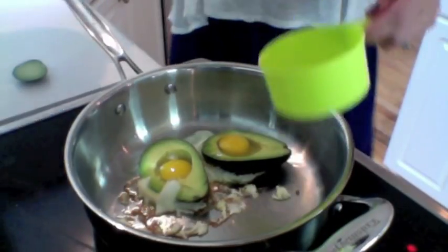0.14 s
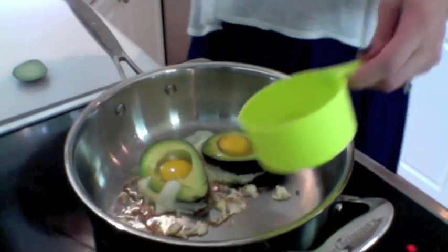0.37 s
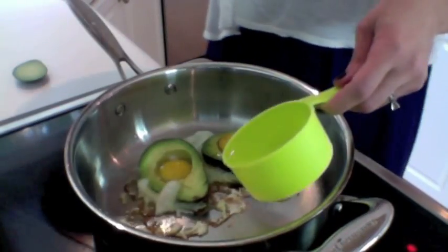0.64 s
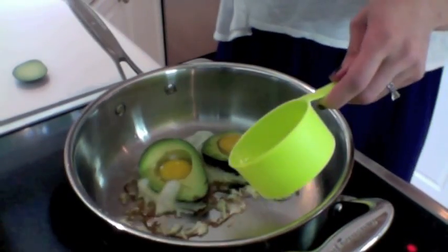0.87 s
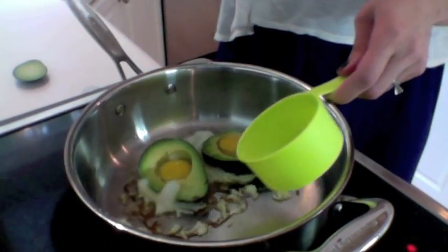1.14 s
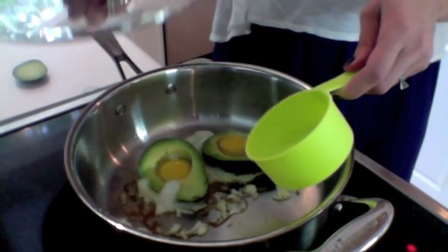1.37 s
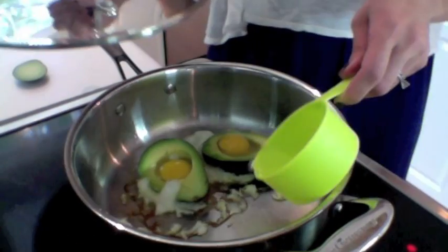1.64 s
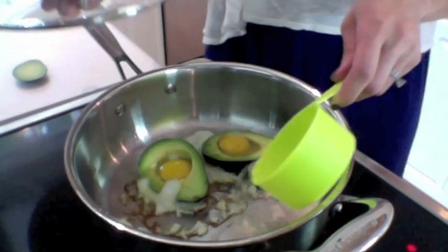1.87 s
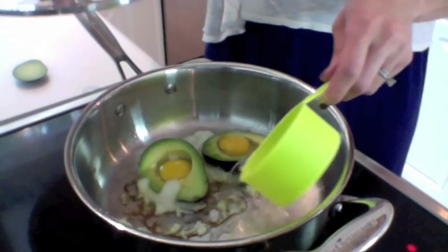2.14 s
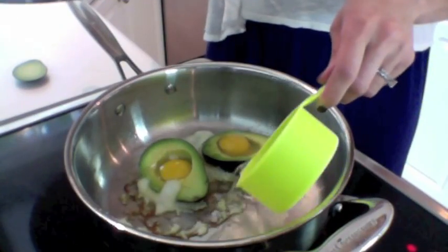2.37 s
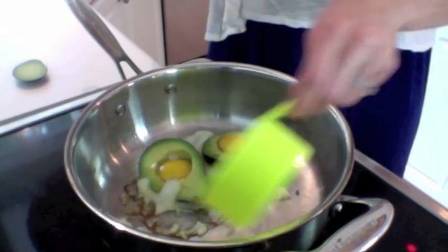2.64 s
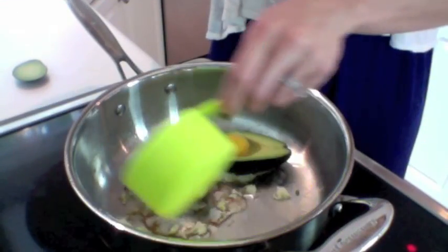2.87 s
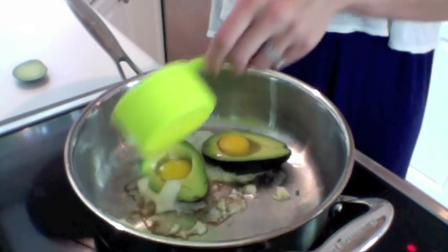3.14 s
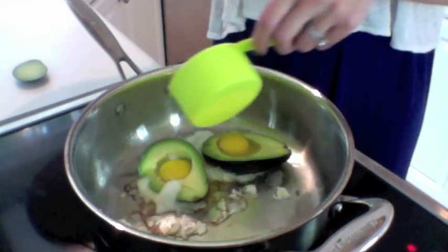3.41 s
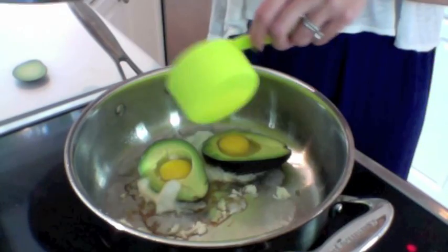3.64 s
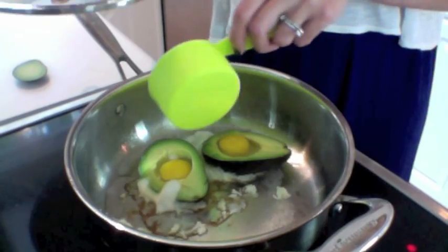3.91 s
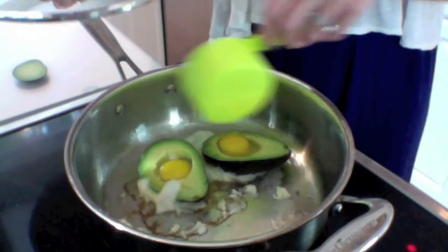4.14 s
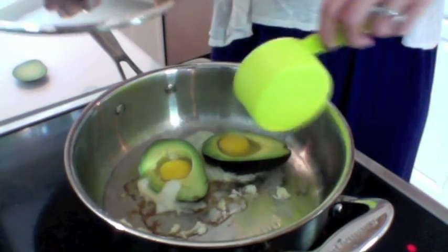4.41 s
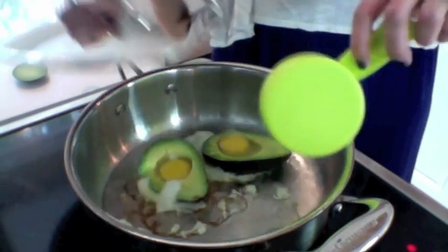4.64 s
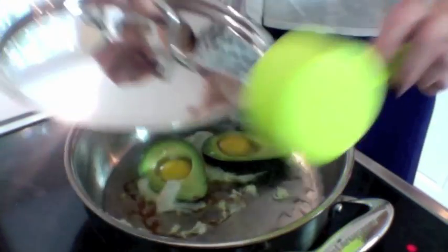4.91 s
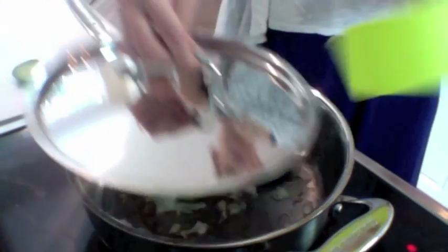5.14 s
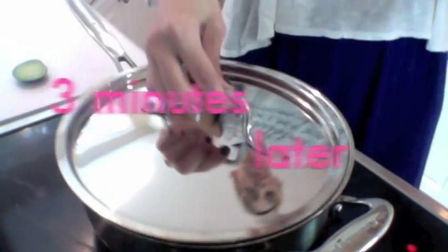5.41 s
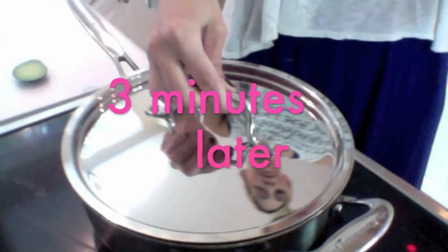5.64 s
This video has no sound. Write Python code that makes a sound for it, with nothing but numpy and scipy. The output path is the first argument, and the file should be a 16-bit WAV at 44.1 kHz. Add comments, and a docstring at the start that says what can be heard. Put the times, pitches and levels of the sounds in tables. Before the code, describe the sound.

Water poured into a hot oiled steel pan flares into loud sizzling and bubbling, calms, then a metal lid clanks shut and a plastic cup is set down.

```python
"""A small microphone near the stove in a kitchen: over a hush and hum, food spits in an oiled steel pan.
Cracks with sprays of noise are droplets; short dull puffs with dying tones are bubbles popping, and knocks.
A cup touches the pan and water is poured in: noise flares up, and filtered noise roars, bubbles, fizzes, calms.
A faint whistle swells; a steel lid touches the rim, wavers (ringing modes, a throbbing tone) and drops shut.
Last, the plastic cup is set down: softer knocks that ring its own modes."""
import sys
import numpy as np
from scipy import signal
from scipy.fft import rfft, irfft
from scipy.io import wavfile
from scipy.ndimage import uniform_filter1d

SR = 44100
rng = np.random.default_rng(int(sys.argv[2]) if len(sys.argv) > 2 else 0)


def master(y):
    """Save y as 16-bit WAV."""
    cut = np.clip(np.atleast_2d(y).T, -1, 1)
    pcm = np.round(cut * 32767)  # scale
    wavfile.write(sys.argv[1], SR, pcm.astype(np.int16))


def undo_db(level):
    """Turn decibels back into plain size, where 20 dB means ten times bigger."""
    steps = np.asarray(level, float) / 20
    return 10 ** steps


N = 254898

# how unevenly the fat fizzes: t/s, factor
UNEVENNESS = [(1.2, 0.48), (2.0, 0.91), (2.15, 1.32), (2.95, 0.96), (3.1, 0.61), (5.8, 0.6)]
# the lid chattering into place, with one rebound: t/s, rattle level/dB, scrape level/dB, length/s
LID_KNOCKS = [(5.269, -45.5, -56, 0.007), (5.272, -41, -52, 0.055), (5.357, -56, -80, 0.013)]


def evened(x):
    """Scales to rms 1."""
    return x / np.sqrt(np.mean(x ** 2) + 1e-20)


def coloured(x, points):
    """Shapes x by a spectrum of (f/Hz, level/dB) points; rms 1."""
    f, db = np.transpose(points)
    hz = np.fft.rfftfreq(len(x), 1 / SR)
    gain = undo_db(np.interp(np.log(hz + 1), np.log(f + 1), db))
    return evened(irfft(rfft(x) * gain, len(x)))


def add(mix, s, sound):
    """Mixes a sound in at s seconds."""
    part = mix[round(s * SR):][:len(sound)]
    part += sound[:len(part)]


def resonate(x, hz, width):
    """One pole at hz, width in Hz: a resonance of gain 1."""
    r = np.exp(-np.pi * width / SR)
    return 2 * signal.lfilter([1 - r], [1, -r * np.exp(2j * np.pi * hz / SR)], x).real


def mode_width(t60):
    """Width in Hz of a mode that dies by 60 dB in t60 seconds."""
    return np.log(1000) / np.pi / t60


def ring(x, modes):
    """Clicks in x set off dying modes, each starting at its own level."""
    return sum(undo_db(db) * resonate(x, hz, mode_width(t60)) * t60 * SR / 2 / np.log(1000)
               for hz, db, t60 in modes)


def clang(x, modes):
    """Knocks in x ring each mode, which takes its own share of their energy."""
    rung = [resonate(x, hz, mode_width(t60)) for hz, db, t60 in modes]
    return sum(undo_db(mode[1]) * evened(r) for mode, r in zip(modes, rung)) * np.std(x)


def drift(seconds):
    """Slow chance of spread 1."""
    size = round(seconds * SR)
    return evened(uniform_filter1d(uniform_filter1d(rng.standard_normal(N), size), size))


def crackle(per_s, spread_db, tail_s):
    """Random bursts of uneven size, each a puff of noise that swells fast and dies more slowly."""
    size = undo_db(spread_db * np.minimum(rng.exponential(1, N), 4))
    size *= rng.random(N) < per_s / SR
    power = signal.lfilter([1], [1, -np.exp(-1 / (tail_s * SR))], size ** 2)
    power = signal.lfilter([1], [1, -np.exp(-3 / (tail_s * SR))], power)
    return evened(np.sqrt(power) * rng.standard_normal(N))


def patchy(x, patch_db, whistle, tilt_db=0):
    """Random patches some hundred Hz wide, brief narrow whistles of escaping steam, and a tilt in dB per octave."""
    hz, t, z = signal.stft(x, SR, nperseg=256, noverlap=192)
    field = uniform_filter1d(rng.standard_normal(z.shape), size=3, axis=0)
    field = evened(uniform_filter1d(field, size=20, axis=1))
    starts = rng.random(z.shape) * (rng.random(z.shape) < 0.012)
    streaks = signal.lfilter([1], [1, -0.945], uniform_filter1d(starts, size=3, axis=1), axis=1)
    sputter = np.interp(t, *np.transpose(UNEVENNESS))
    slope = np.interp(t, np.arange(N) / SR, tilt_db * np.ones(N))
    z = z * (1 + whistle * sputter * streaks)
    z = z * undo_db(patch_db * sputter * field + slope * np.log2((hz[:, None] + 100) / 9000))
    return signal.istft(z, SR, nperseg=256, noverlap=192)[1][:N]


def bowl(x, lift_db):
    """The bowl of steel and air adds its resonances to what sounds inside it."""
    # f/Hz, width/Hz, level/dB
    pan_modes = [(580, 63, -8), (713, 11.3, -3), (1160, 7.3, 4), (1640, 20, 0), (2070, 36, 0.5),
                 (2190, 144, 3.5), (2790, 84, 5), (3290, 640, 7), (3760, 66, 7)]
    return x + undo_db(lift_db) * sum(undo_db(db) * resonate(x, hz, width) for hz, width, db in pan_modes)


def room(x):
    """Sparse reflections of random sign die away exponentially behind the direct sound."""
    level_db, t60_s = -8.5, 0.17
    taps = np.zeros(SR // 2)
    at = np.arange(200, len(taps) - 20, 20)
    taps[at + rng.integers(0, 20, len(at))] = rng.choice([-1., 1.], len(at))
    taps *= undo_db(-60 * np.arange(len(taps)) / SR / t60_s)
    return x + undo_db(level_db) * signal.oaconvolve(x, taps / np.linalg.norm(taps))[:N]


def kitchen():
    """A hush, steady below 500 Hz and fluttering at random above, with the faint hum of appliances."""
    # spectrum of the hush: f/Hz, level/dB per Hz
    hush_spectrum = [(12, -60), (20, -53), (91, -2.5), (147, -7.5), (212, 1.5), (521, -5.5), (729, 0),
                     (1430, -6), (2120, -6.5), (2510, -11.5), (3330, -10.5), (4790, -13.5), (7100, -12),
                     (13900, -27.5), (16500, -58)]
    # hum of appliances: f/Hz, width/Hz, level/dB rms
    hums = [(199, 3, -86), (241.3, 4.5, -85.5), (395, 4.7, -84)]
    hush_db = -72
    noise = rng.standard_normal(N) + 0.5 * crackle(80, 0.61, 0.0021)
    hush = bowl(coloured(noise, hush_spectrum), -8.5)
    steady = signal.sosfiltfilt(signal.butter(2, 500, fs=SR, output="sos"), hush)
    fluttering = undo_db(2.4 * drift(0.023)) * (hush - steady)
    hum = sum(undo_db(db) * evened(resonate(rng.standard_normal(N), hz, width)) for hz, width, db in hums)
    return undo_db(hush_db) * (steady + fluttering) + hum


def set_down(drops, modes, pings, hardness_hz, clatter_db):
    """An object chatters into place: quick soft knocks ring its modes, with clatter and a bright scrape."""
    settle_db, settle_db_per_s, scrape_edge_db = -3, 1000, -14
    t = np.arange(0, .5, 1 / SR)
    shake, rub = np.zeros(len(t)), np.zeros(len(t))
    for s, rattle_db, scrape_db, length in drops:
        u = t - (s - drops[0][0])
        start = np.clip(u / 0.00076, 0, 1)
        after = undo_db(-settle_db_per_s * np.maximum(u - length, 0))
        part = np.clip(u / length, 0, 1)
        shake += start * after * undo_db(rattle_db + settle_db * (2 * part - 0.9) ** 2)
        rub += start * after * undo_db(scrape_db + scrape_edge_db * (2 * part - 1.3) ** 2)
    knocks = (rng.random(len(t)) < 3000 / SR) * rng.standard_normal(len(t))  # 3000 per second
    soft = signal.butter(3, hardness_hz, fs=SR, output="sos")
    knocks = shake * evened(signal.sosfilt(soft, evened(knocks)))
    scrape = resonate(resonate(rng.standard_normal(len(t)), 7600, 5400), 7600, 5400)
    scrape = rub * evened(scrape)
    sound = clang(knocks, modes) + undo_db(clatter_db) * knocks + 0.29 * scrape + clang(scrape, pings)
    return drops[0][0], sound


def cup():
    """The plastic cup is set down: soft knocks ring its short modes; returns the time and the sound."""
    # t/s, rattle level/dB, scrape level/dB, length/s
    cup_knocks = [(5.516, -46.5, -62.5, 0.024)]
    # f/Hz, share of energy/dB, t60/s
    cup_modes = [(81, -13, 0.043), (127, -10, 0.061), (230, -10.5, 0.11), (476, -20, 0.033),
                 (620, -3.5, 0.028), (755, 2, 0.036), (950, -1.5, 0.057), (1060, -2, 0.046),
                 (1280, -18, 0.049), (1400, -10, 0.05), (1650, -8, 0.26), (1920, -9, 0.027),
                 (2180, -23, 0.077), (2680, -28, .07), (3470, -24, .05)]
    return set_down(cup_knocks, cup_modes, [], 1600, -0.6)


def lid():
    """The lid drops shut: knocks ring the damped steel, the scrape wakes thin tones; returns time and sound."""
    # the steel, seated and damped: f/Hz, share of energy/dB, t60/s
    lid_modes = [(85, -15.5, 0.044), (263, -2.5, 0.046), (366, -11.5, 0.028), (650, -3, 0.039),
                 (747, -5.5, 0.036), (905, -0.5, 0.08), (1037, 5.5, 0.1), (1140, -25, 0.15),
                 (1295, -14, 0.34), (1390, -28, .08), (1650, -12, 0.21), (1750, -8.5, 0.042),
                 (1870, -20, .08), (2170, -3.5, .085), (2300, -16, 0.28), (2640, -25, 0.11),
                 (2800, -16, 0.13), (2944, -9, 0.048), (3260, -20, 0.044), (3880, -14.5, 0.033),
                 (3960, -26, 0.063), (4300, -39, .07), (4700, -36, 0.086)]
    # thin tones that the scrape wakes: f/Hz, share of energy/dB, t60/s
    thin_tones = [(13720, -13, 0.15), (7600, -8, 0.014), (6900, -12, 0.022), (9700, -18, 0.046),
                  (11100, -32, .05)]
    return set_down(LID_KNOCKS, lid_modes, thin_tones, 2500, -7.0)


def rim():
    """Light touches, first of the cup on the pan, later of the lid, ring these modes over a throbbing low tone."""
    # upper modes of the steel ringing freely: f/Hz, level/dB, t60/s
    rim_modes = [(746, 6, 0.024), (1030, -1, 0.31), (1140, -13, .25), (1340, -20, 0.27), (1520, -17, .8),
                 (1590, -11, .6), (1980, -12.5, 0.23), (2950, -7, 0.27)]
    # touches: t/s, level/dB
    touches = [(1.291, -63), (5.049, -40.5), (5.06, -52), (5.072, -37), (5.094, -38), (5.104, -51),
               (5.115, -58), (5.129, -64), (5.144, -53)]
    # lowest tone, wavering and sinking as the lid closes the gap: t/s, f/Hz
    lowest_tone = [(5.046, 366), (5.065, 353), (5.12, 331), (5.16, 340), (5.19, 337), (5.226, 297),
                   (5.268, 276)]
    # swells of the lowest tone: t of the peak/s, level/dB, swell/s, fade/dB per s
    throbs = [(1.3, -63.5, .01, 40), (5.052, -37, .005, 1300), (5.07, -48.5, .02, 70),
              (5.094, -45, .015, 900), (5.12, -44, .012, 800), (5.226, -48, .014, 1200),
              (5.251, -50, .011, 1200)]
    rest_hz, hardness_hz = 330, 895  # the lowest tone ahead of its first row; how hard a touch is
    taps, t = np.zeros(N), np.arange(400) / SR
    pulse = t * np.exp(-2 * np.pi * hardness_hz * t)
    for s, db in touches:
        add(taps, s, undo_db(db) * pulse / pulse.sum())
    t = np.arange(N) / SR
    hz = np.interp(t, *np.transpose(lowest_tone), left=rest_hz)
    tone = np.sqrt(2) * np.sin(2 * np.pi * np.cumsum(hz) / SR)
    throb = np.zeros(N)
    for s, db, swell, fade in throbs:
        rise = np.clip(1 + (t - s) / swell, 0, 1) ** 2
        throb += rise * undo_db(db - fade * np.maximum(t - s, 0))
    shut = np.clip((LID_KNOCKS[0][0] - t) / 0.016, 0, 1)  # the seated lid stops the ringing
    return shut * (ring(taps, rim_modes) + throb * tone)


def whistles():
    """A faint fuzzy whistle as the lid comes over, likely steam: narrow noise that swells and fades."""
    # t/s, length/s, f/Hz, level/dB
    calls = [(4.86, 0.18, 1590, -63), (5.049, .22, 1560, -67)]
    out = np.zeros(N)
    for s, length, hz, db in calls:
        size = round(length * SR)
        noise = evened(resonate(rng.standard_normal(size), hz, 0.013 * hz))
        add(out, s, undo_db(db) * np.hanning(size) ** 0.5 * noise)
    return out


def pops_and_knocks():
    """Bubbles popping, and knocks such as the cup touching the pan: a short dull puff thuds under a dying tone."""
    # t/s, tone level/dB, tone f/Hz, t60/s, thud level over the tone/dB
    thumps = [(0.069, -62, 673, .038, -1), (0.159, -57, 1150, 0.028, -1), (0.234, -54.5, 2060, 0.027, 1.5),
              (0.442, -58.5, 730, .045, 2.5), (0.484, -54, 1960, 0.043, 1), (0.548, -47, 710, 0.027, -11),
              (0.694, -37, 2226, 0.041, -7.5), (0.693, -39, 1124, 0.022, -3), (1.153, -50, 756, 0.022, -4),
              (1.267, -54, 2070, 0.071, 4), (1.292, -42, 625, 0.08, -6), (1.292, -42.5, 1593, 0.038, -6),
              (1.332, -43, 3420, .043, -8), (1.515, -42.5, 1153, 0.13, -12), (1.892, -32.5, 715, 0.042, -6),
              (2.093, -34, 693, 0.083, 3), (2.359, -43.5, 710, 0.056, -4), (2.534, -28.5, 754, 0.025, -4),
              (2.535, -26.5, 1024, 0.023, -16), (2.566, -34.5, 1600, 0.036, 0),
              (2.694, -25.5, 2640, 0.017, -4.5), (2.7, -28, 3360, 0.023, -2.5),
              (2.862, -31, 2030, 0.02, -2.5), (3.122, -35.5, 2230, 0.01, 2.5), (3.254, -37, 1615, 0.034, 1),
              (3.318, -38, 1630, 0.039, 1), (3.35, -37, 1710, 0.025, -3), (3.429, -43.5, 2190, 0.17, -10),
              (3.614, -42.5, 2200, 0.05, -13), (3.674, -44, 2180, 0.058, -6),
              (3.785, -37.5, 2070, 0.044, -6), (4.004, -43, 2070, 0.088, -10),
              (4.31, -45.5, 1160, 0.066, -9), (4.332, -43.5, 674, 0.033, 1), (4.493, -39.5, 1140, 0.019, 0),
              (5.634, -58, 890, 0.039, 2), (5.717, -53, 1480, 0.046, -6)]
    out, t = np.zeros(N), np.arange(SR // 5) / SR
    dull = signal.butter(2, [300, 3500], "band", fs=SR, output="sos")
    for s, db, hz, t60, thud_db in thumps:
        puff = signal.sosfilt(dull, rng.standard_normal(len(t)) * np.exp(-t / 0.0038))
        tone = np.sin(2 * np.pi * hz * t) * undo_db(-60 * t / t60) * np.minimum(t / 0.0019, 1)
        thud = bowl(puff, 2.7)
        add(out, s, undo_db(db) * (tone + undo_db(thud_db) * thud / abs(thud).max()))
    return out


def spits():
    """Droplets burst in the fat: a grainy spray swells and dies, with a weak and then a full crack at its start."""
    # t/s, spray level/dB, centre f/Hz, crack level over the spray/dB
    bursts = [(0.1595, -73, 5820, 3), (0.3745, -60, 9100, 0), (0.378, -51.5, 12200, 0),
              (0.381, -57, 10500, 3), (0.395, -59, 11700, 1), (0.437, -63, 8500, -3),
              (0.658, -50, 7200, -4), (0.672, -47.5, 6860, -2), (0.696, -45, 6700, 13),
              (0.843, -62, 6000, 2), (0.848, -60, 9100, 2), (0.8577, -56, 13100, 16.5),
              (0.8745, -62, 8000, 2), (0.8987, -67, 5660, 5), (1.0046, -68, 6100, 17),
              (1.1178, -58.5, 5600, -5), (1.269, -68, 6980, 1), (2.113, -52, 6090, 1),
              (2.17, -51.5, 6900, 1), (2.28, -37, 6550, -9), (2.3792, -34, 12500, 18.5),
              (2.4942, -52, 6260, 5), (2.528, -39.5, 7460, 18), (2.535, -42, 13000, 9),
              (2.603, -44, 6700, 2), (2.6963, -44, 8100, -5), (2.882, -61, 5000, 1), (2.933, -45, 7200, 10),
              (3.857, -54, 5700, 3), (4.297, -59, 6070, -1), (4.618, -55.5, 6300, 14),
              (4.779, -56, 7600, -1), (4.8192, -49.5, 6700, -4)]
    sprays, cracks, t = np.zeros(N), np.zeros(N), np.arange(SR // 3) / SR
    high = signal.butter(2, 3500, "high", fs=SR, output="sos")
    for s, db, hz, crack_db in bursts:
        noise = signal.sosfilt(high, rng.standard_normal(len(t)))
        spray = 0.15 * noise + resonate(noise, hz, 0.076 * hz) + 0.5 * resonate(noise, 7150, 1100)
        shape = 0.78 * np.exp(-t / 0.0044) + 0.21 * undo_db(-60 * t / 0.096)  # fast, then slow decay
        add(sprays, s, undo_db(db) * np.minimum(t / 0.0014, 1) * shape * evened(spray))
        crack = np.exp(-t / 0.00022) * noise
        crack *= undo_db(db + crack_db) / abs(crack).max()
        add(cracks, s + 0.0017, crack)
        add(cracks, s + 0.0013, 0.27 * crack)
    return patchy(sprays, 0.93, 3.5) + cracks


def boil():
    """Steam roars in the pan, bubbles burst low in it and the fat fizzes above."""
    # the water boiling off: t/s, roar level/dB, bubbling level/dB, fizz level/dB
    boil_levels = [(1.24, -91, -83, -79), (1.28, -71, -75, -65.5), (1.309, -58.5, -55, -53),
                   (1.44, -50, -63, -48), (1.51, -45.5, -52, -45.5), (1.68, -45.5, -48, -49),
                   (1.86, -45.5, -48.5, -53), (2.05, -47, -51, -57.5), (2.13, -47, -49, -61),
                   (2.35, -47.5, -49, -57), (2.52, -50, -51, -62), (2.6, -44, -49, -57),
                   (2.7, -45.5, -48, -54.5), (2.81, -45.5, -47.5, -49), (2.94, -46, -54, -57.5),
                   (3.0, -49, -52.5, -61), (3.34, -54, -50, -58.5), (3.8, -55, -56, -62.5),
                   (4.26, -61, -59.5, -66.5), (4.35, -57.5, -58, -63.5), (4.91, -59, -58, -65),
                   (5.03, -64.5, -64.5, -67), (5.228, -64.5, -61.5, -72), (5.338, -73, -59, -94),
                   (5.406, -66, -61, -99), (5.78, -73, -82, -101)]
    # spectrum of roar and bubbling ahead of the pan: f/Hz, level/dB per Hz
    roar_spectrum = [(59, -61), (100, -58), (252, -9), (460, -9.5), (709, -0.5), (958, -4.5), (1130, -0.5),
                     (1400, -4.5), (1620, 4.5), (2500, -1), (9000, -20.5), (11700, -82), (19800, -120)]
    # spectrum of the fizz ahead of its tilt: f/Hz, level/dB per Hz
    fizz_spectrum = [(2350, -10), (4000, 1.5), (4980, -1.5), (7820, -3.5), (11900, -15.5), (14300, -16),
                     (16000, -21), (16500, -81)]
    # water meeting hot fat flares up at once and fades: t/s, level/dB, fade/dB per s, brightness/dB per octave
    flare_rows = [(1.3, -50, 38, 5.5), (2.12, -50, 86, 4.5), (2.28, -51.5, 42, 6), (2.38, -50, 90, 11),
                  (2.5, -48.5, 50, 7), (2.53, -47, 200, 10), (2.57, -47, 300, 10), (2.6, -43.5, 50, 7),
                  (2.7, -55, 60, -9), (2.93, -52, 112, 2)]
    flare_rise_s, fizz_bright_db = 0.0038, 1.7  # brightness in dB per octave
    gurgle_hz, gurgle_width_hz, gurgle_db = 688, 178, -4  # middling bubbles share one hollow tone
    t = np.arange(N) / SR
    s, *columns = np.transpose(boil_levels)
    roar_db, bubble_db, fizz_db = (np.interp(t, s, c, left=-120) for c in columns)

    # fizz and flares add in power, and each pulls the tilt by its share
    fizz_power = undo_db(2 * fizz_db)
    power, tilt = fizz_power.copy(), fizz_power * fizz_bright_db
    for at, db, fade, bright_db in flare_rows:
        flare = undo_db(2 * (db - fade * (t - at))) * np.clip((t - at) / flare_rise_s, 0, 1)
        power += flare
        tilt += flare * bright_db
    tilt_db = tilt / power

    surge = drift(0.01)  # shared by all layers
    steam = rng.standard_normal(N) + 0.33 * crackle(250, 6.5, 0.002)
    bubbles = 0.97 * rng.standard_normal(N) + crackle(90, 1.5, 0.0063)
    high = signal.butter(3, 1400, "high", fs=SR, output="sos")
    low = signal.butter(3, [220, 1400], "band", fs=SR, output="sos")
    roar = evened(signal.sosfilt(high, bowl(coloured(steam, roar_spectrum), 6.4)))
    bubbling = evened(signal.sosfilt(low, bowl(coloured(bubbles, roar_spectrum), 3.5)))
    gurgle = crackle(60, 3.24, 0.0085)
    gurgle = resonate(resonate(gurgle, gurgle_hz, gurgle_width_hz), gurgle_hz, gurgle_width_hz)
    bubbling = evened(bubbling + undo_db(gurgle_db) * evened(gurgle))
    grains = 0.56 * crackle(200, 4.9, 0.0015) * np.interp(t, *np.transpose(UNEVENNESS))
    fizz = coloured(rng.standard_normal(N) + grains, fizz_spectrum)
    low_layers = undo_db(roar_db + 0.9 * surge) * roar + undo_db(bubble_db + 0.55 * surge) * bubbling
    fizzing = np.sqrt(power) * undo_db(0.74 * surge) * fizz
    return patchy(low_layers, 0.98, 0.63) + patchy(fizzing, 1.9, 1.8, tilt_db)


def scene():
    """The stove, its separate hits with the room's reflections, over the kitchen's hush."""
    hits = spits() + pops_and_knocks() + rim() + whistles()
    add(hits, *lid())
    add(hits, *cup())
    small = signal.butter(4, 104, "high", fs=SR, output="sos")  # small things radiate little below 104 Hz
    stove = signal.sosfilt(small, room(hits) + boil())
    return (stove + kitchen())[None]


def top_cut(x):
    """Nothing passes above the cut-off."""
    return signal.sosfilt(signal.butter(12, 16660, fs=SR, output="sos"), x)


def record(dry):
    """The finished mix as it is stored."""
    return top_cut(dry)


dry = scene()
out = record(dry)
master(out)
```